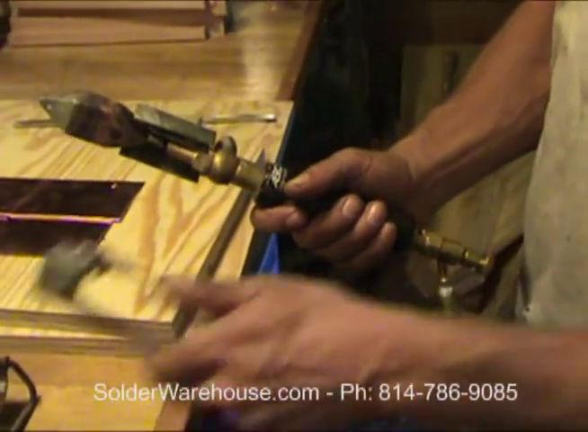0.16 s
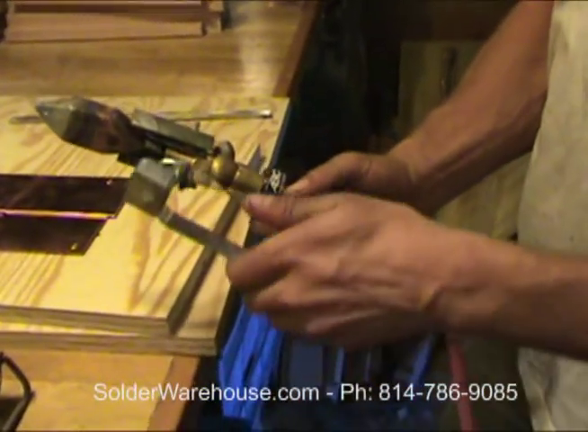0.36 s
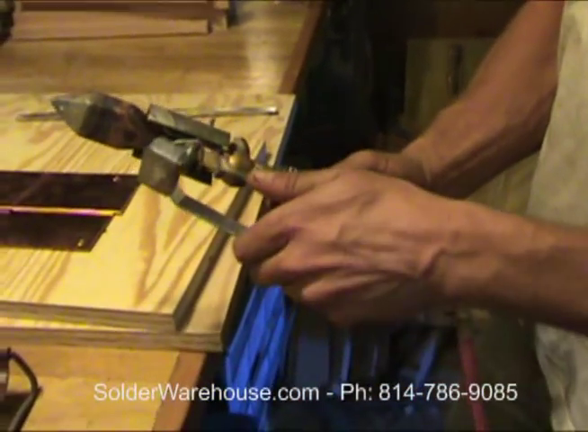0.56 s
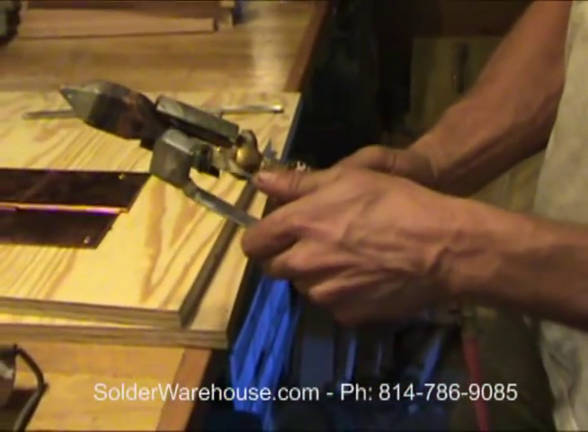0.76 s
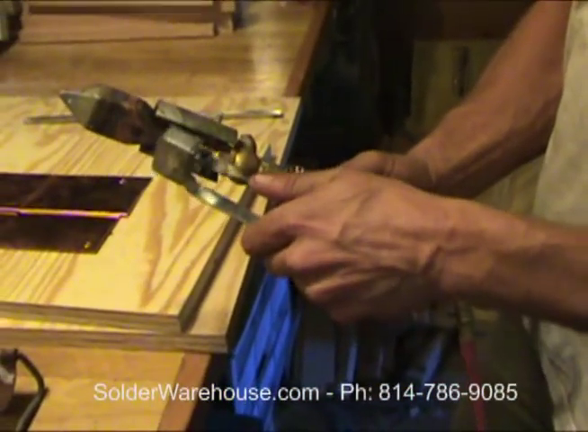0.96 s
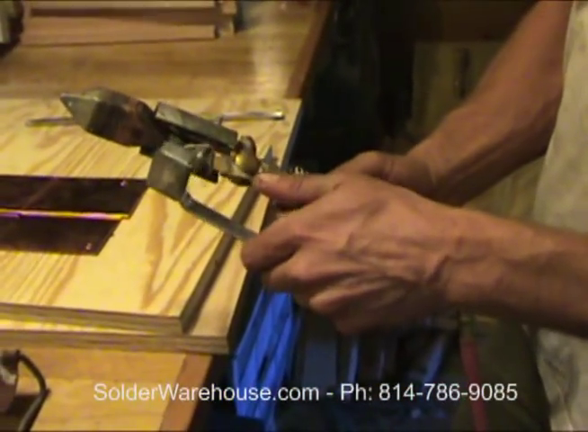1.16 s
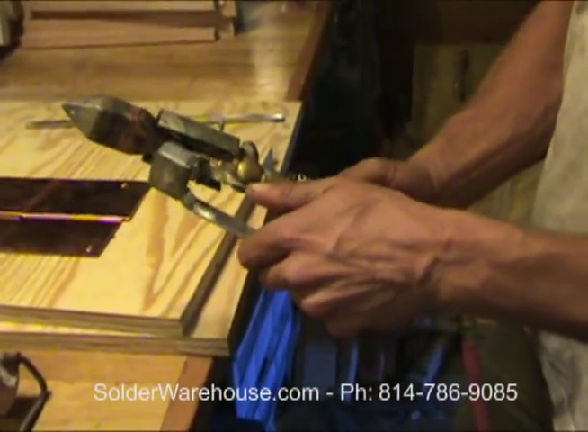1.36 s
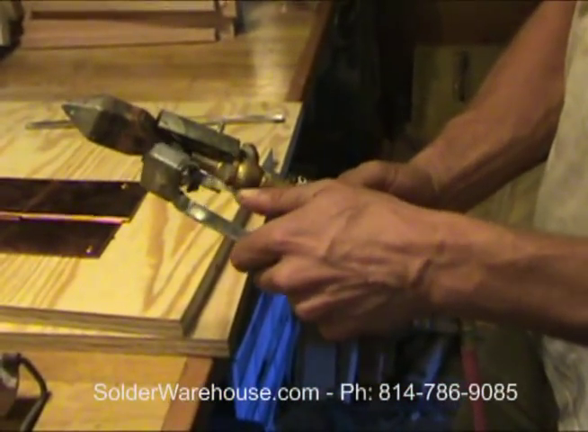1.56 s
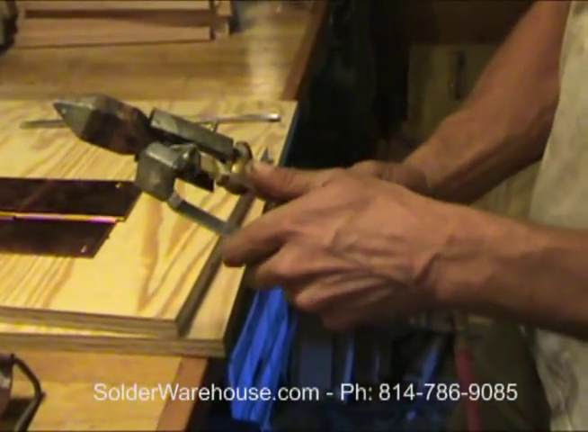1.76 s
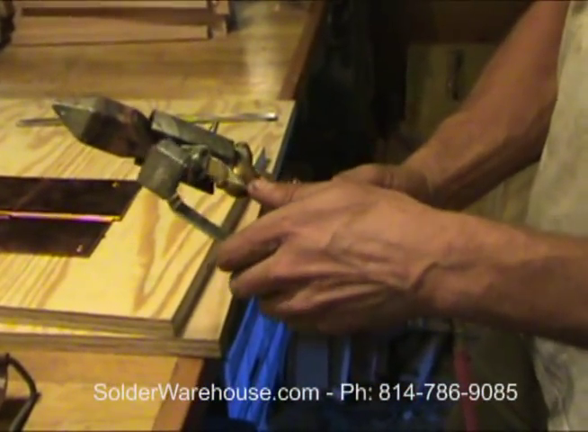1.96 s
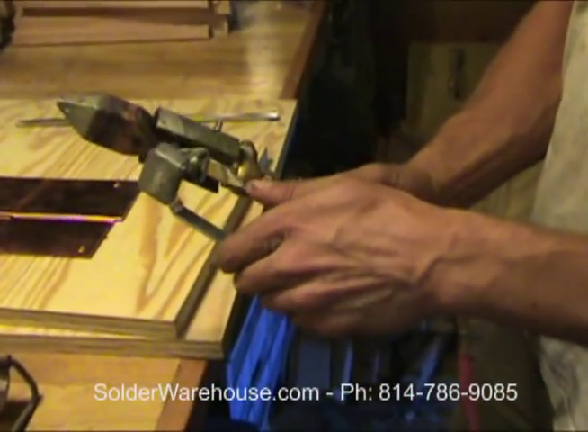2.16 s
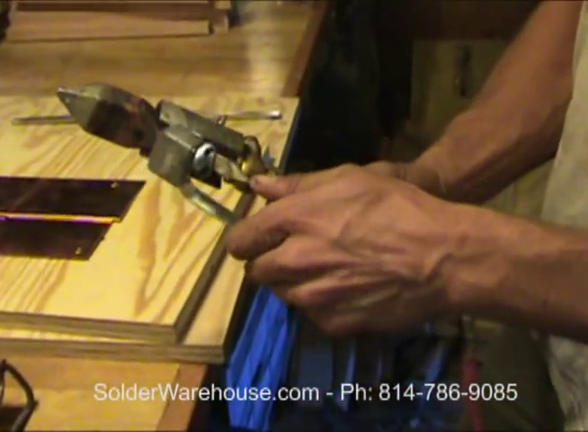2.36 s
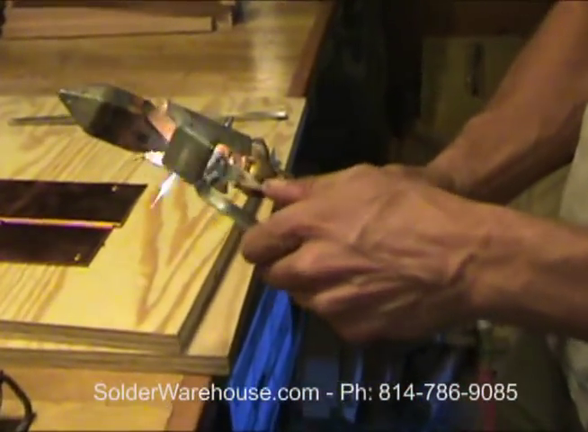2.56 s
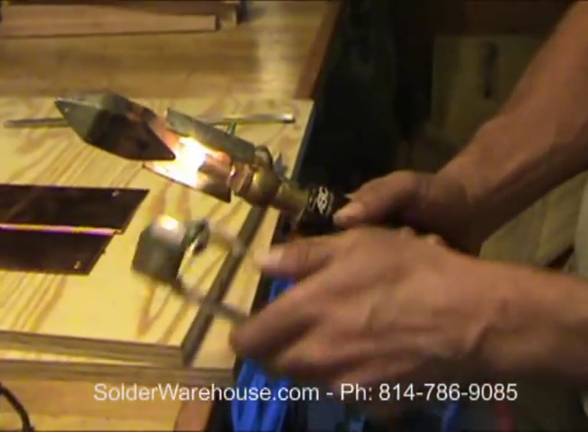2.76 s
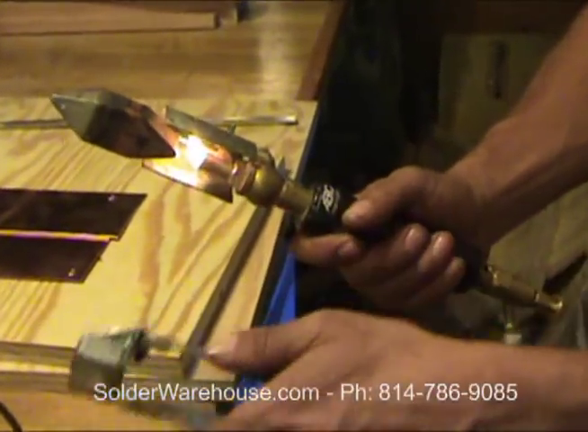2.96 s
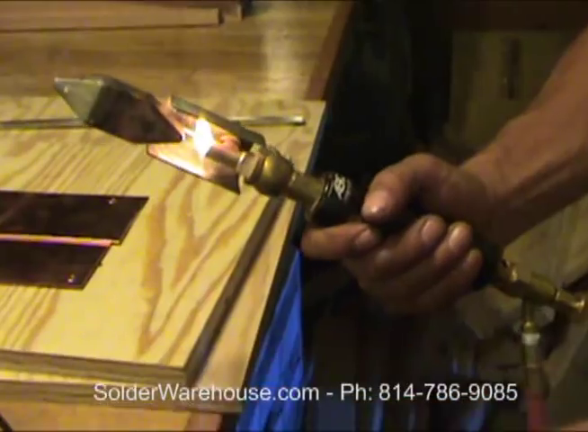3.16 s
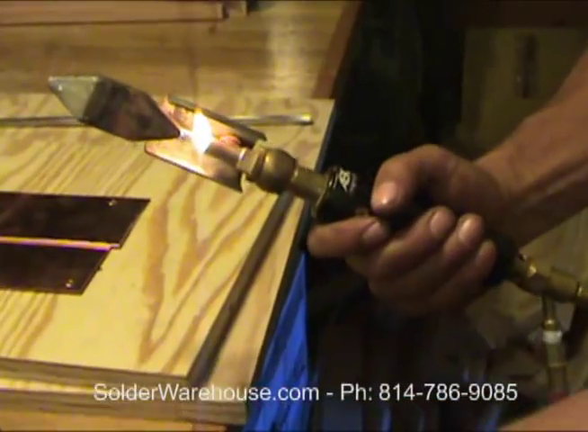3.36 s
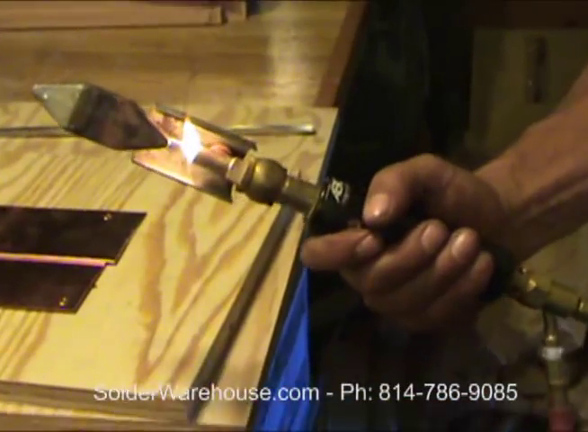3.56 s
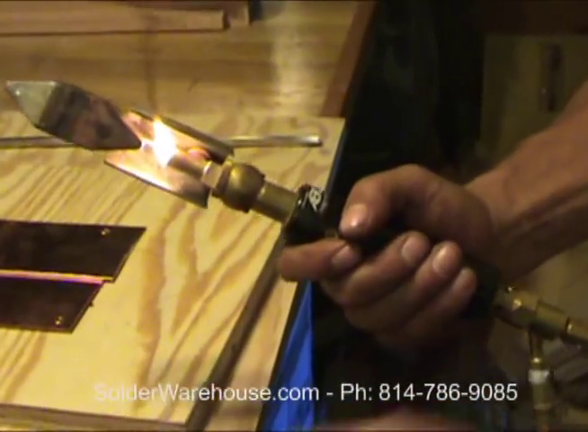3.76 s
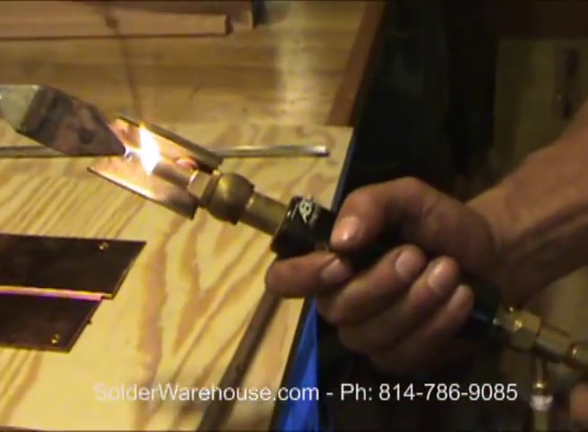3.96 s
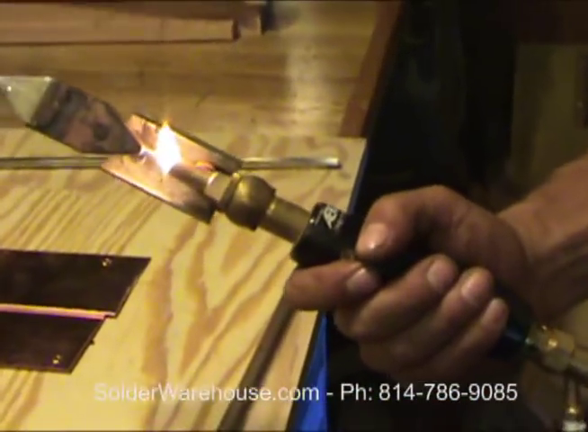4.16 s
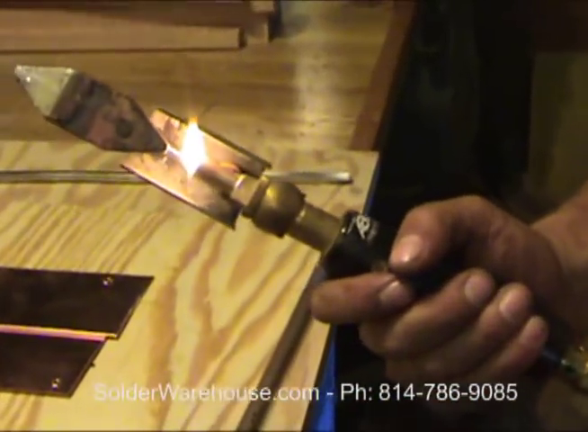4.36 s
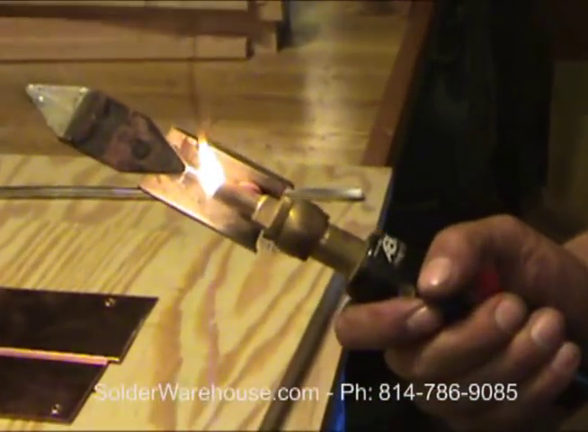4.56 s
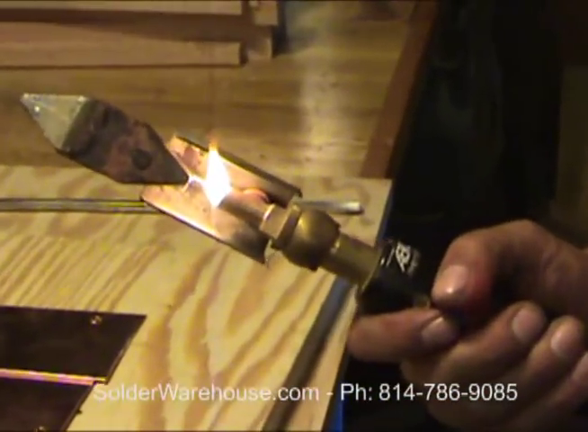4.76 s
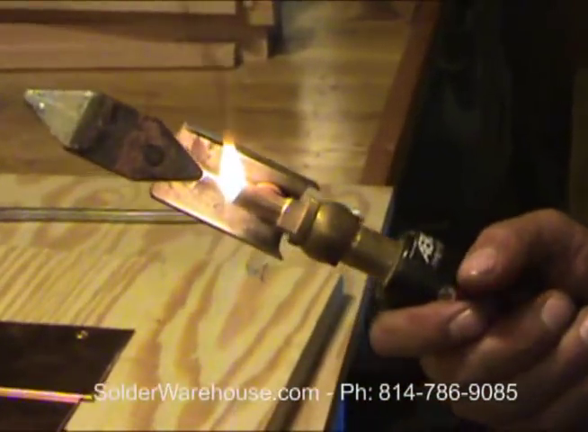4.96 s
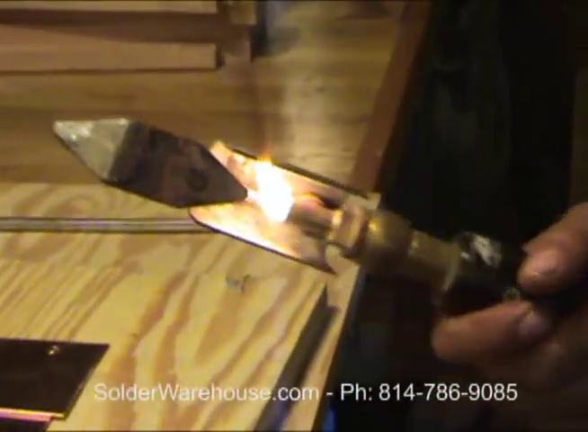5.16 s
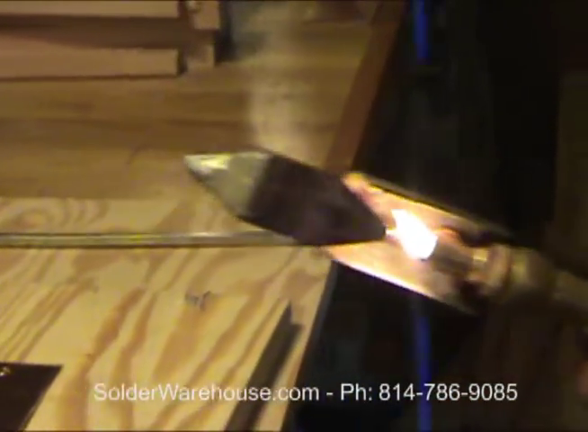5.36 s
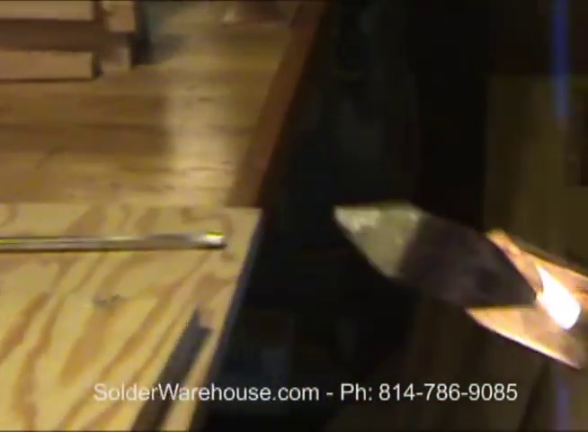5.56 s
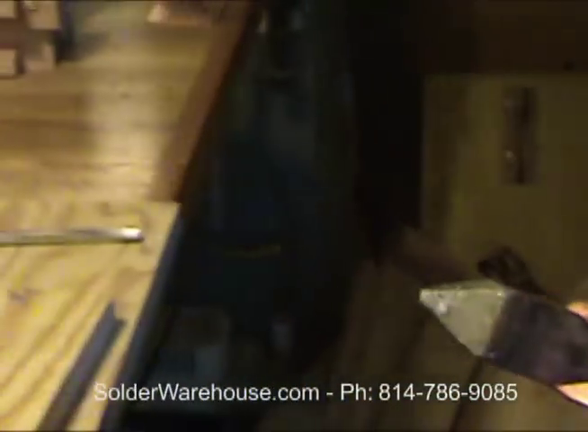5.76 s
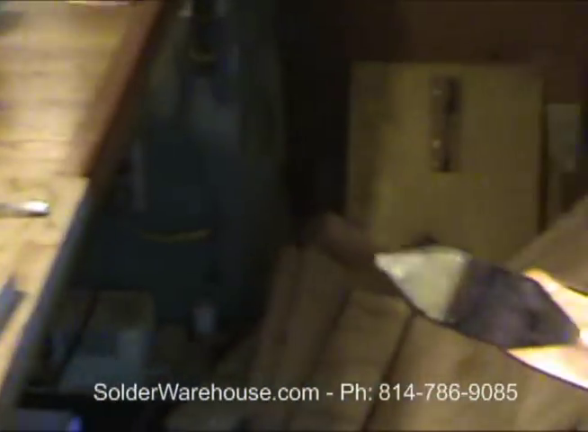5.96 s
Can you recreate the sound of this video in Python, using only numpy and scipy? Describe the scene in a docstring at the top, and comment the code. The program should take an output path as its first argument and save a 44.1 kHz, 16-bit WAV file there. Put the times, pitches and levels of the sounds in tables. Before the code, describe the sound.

A flint striker rasps and clinks several times, gas catches with a sharp pop and brief roaring hiss, then the striker clatters onto wood.

```python
"""A flint striker rasps against its steel cup, lighting a gas soldering torch over a wooden workshop bench.
Flint and arm are trains of contacts and single snags that ring the cup and crackle as coloured noise.
The gas pops as pressure pulses and gushes as shaped noise; the released striker arm buzzes on.
The valve squeaks as a few gliding harmonics, and the dropped striker rings the boards' modes as it bounces.
Taps ring the torch, noise rustles as it is carried off, and echoes, hiss, hum and a whine surround it all."""
import sys
import numpy as np
from scipy import signal
from scipy.fft import rfft, irfft, next_fast_len
from scipy.io import wavfile

SR = 44100
rng = np.random.default_rng(int(sys.argv[2]) if len(sys.argv) > 2 else 0)


def inscribe(sig):
    """Save sig as 16-bit PCM at rate SR to the path in sys.argv[1].

    A 1-D sig is mono; a 2-D sig holds one channel per row.
    Samples are clipped to [-1, 1] before scaling.
    """
    pcm = np.round(np.clip(np.atleast_2d(sig).T, -1, 1) * 32767)
    wavfile.write(sys.argv[1], SR, pcm.astype(np.int16))


N = 264600
T = np.arange(N) / SR   # time in seconds

# Ringing modes of the striker's steel cup: pitch_hz, level_db, held_t60_s (pressed by the hand), free_t60_s (let go)
CUP_MODES = [(3740, -15, 0.0059, 0.062), (4730, -13, 0.04, 0.18), (4920, -2, 0.047, 0.074),
             (4878, -4.5, 0.011, 0.17), (5070, -27.5, 0.028, 0.6), (5110, -7.5, 0.026, .26),
             (5730, -36, 0.02, 0.279), (7990, -27, 0.045, 0.1194), (8420, -20, .015, 0.045)]
# Tone of the flint's grit: pitch_hz, level_db
CRACK_SPECTRUM = [(200, -23.5), (700, -4), (1200, -7), (1900, 1.5), (3000, -8.5), (4300, 6.5), (5400, -1),
                  (6200, -2.5), (8300, -0.5), (9600, -5), (12500, -8), (16000, -14.5)]
# Tone of the arm's rattle on the cup: pitch_hz, level_db
BUZZ_SPECTRUM = [(500, -37), (1250, -23), (1700, -2), (2200, -9), (3200, -6), (4400, 5.5), (5170, 16.5),
                 (5800, -3), (8300, -5.5), (12000, -11), (16000, -21)]
# Squeezes that drag the flint over the file: start_s, length_s, relative rasp_db
STROKES = [(0.827, 0.031, -40.5), (0.863, 0.023, -30), (0.918, 0.013, -24.5), (1.192, 0.041, -25.5),
           (1.461, 0.044, -31.5), (1.526, 0.011, -31.5), (1.723, 0.043, -24.5), (2.449, 0.065, -32),
           (2.525, 0.063, -27)]
# Hardest snags of the flint and knocks of the arm on the cup: peak_s, cup_ring_db, broad crack_db
SNAGS = [(0.8391, -19, -45), (0.8745, -16, -36), (.9247, -17.5, -43), (1.204, -16, -28),
         (1.2085, -9.5, -30), (1.2128, -17.5, -37), (1.2252, -11.5, -20.5), (1.426, -28.5, -39.5),
         (1.477, -15.5, -36), (1.5023, -23.5, -38), (1.5352, -30, -28), (1.557, -26.5, -35),
         (1.73, -16, -36), (1.7392, -11, -26), (1.7483, -10, -16.5), (1.755, -10, -20.5),
         (2.4364, -24.5, -37.5), (2.456, -20, -41), (2.465, -15.5, -33), (2.4685, -15, -38),
         (2.484, -32, -32.5), (2.534, -11, -17), (2.7765, -3, -20.5), (2.8199, -17, -17),
         (2.8245, -1.5, -16.5), (2.828, -11.5, -13), (2.8412, -15, -36)]
# Pressure pulses as the gas flashes, then explodes: centre_s, peak level_db before the bass cut, half_width_s
POPS = [(2.5540, -13, .00018), (2.5587, -7.5, .0008)]
# Tone of the flame's roar: pitch_hz, level_db
ROAR_SPECTRUM = [(40, -21), (100, -3.5), (200, -2), (260, -12), (340, -2.5), (460, -6), (620, 0.5),
                 (900, -8.5), (1190, -3), (1600, -13.5), (1900, -11), (3000, -15), (3600, -23), (6000, -48)]
# Tone of the flame's hiss: pitch_hz, level_db
HISS_SPECTRUM = [(1180, -27), (2000, -8.5), (3040, -1), (3310, -7.5), (4190, -7), (5030, -1), (7570, -12),
                 (15100, -16), (16000, -21)]
# Striker bouncing on the bench: start_s, relative board_db, clack_db
BOUNCES = [(3.6088, -15.5, -17.5), (3.6682, -29, -20), (3.7235, -30, -35), (3.753, -38, -33),
           (3.792, -26, -28), (3.879, -30.5, -42), (3.952, -38.5, -54), (4.02, -51, -47)]
# Ringing modes of the bench boards: pitch_hz, level_db, t60_s
BENCH_MODES = [(148, -28, 0.23), (267, -35, 0.43), (369, -47, 0.23), (586, -2.5, 0.049), (682, -3.5, 0.07),
               (753, -6.5, 0.064), (900, -3.5, 0.13), (1236, -4.5, 0.099), (1290, -2, 0.04),
               (1480, -11, 0.041), (1630, -19, .04), (1702, -6, 0.074), (2023, -6.5, 0.056),
               (2350, -11, 0.068)]
# Tone of the striker's clack on the wood: pitch_hz, level_db
CLACK_SPECTRUM = [(120, -41), (200, -10.5), (353, -22), (1270, 0.5), (1910, -6.5), (2320, -5.5),
                  (3760, -23), (5080, -14), (5760, -35), (7380, -27), (14000, -51)]
# Tone of the striker rocking on the wood: pitch_hz, level_db
ROCK_SPECTRUM = [(60, -16), (140, -12), (260, 1), (430, -6), (650, 1), (1250, -3.5), (2200, -13),
                 (3000, -25.5), (4200, -26), (5000, -27), (5800, -36), (10000, -40)]
# Taps on the torch: start_s, ring_db, tick_db, main_mode_extra_db
TAPS = [(1.0536, -32.5, -26, 2.5), (1.061, -55, -28, -6), (1.965, -68, -43, -1), (3.308, -67, -43, -5),
        (4.156, -56, -35, -6), (4.168, -36.5, -32.5, -20), (4.7573, -53, -38, -2), (5.624, -62, -33, -8)]
# Ringing modes of the torch's copper shield: pitch_hz, level_db, t60_s
SHIELD_MODES = [(611, -23.5, 0.48), (1360, -17, 0.085), (1874, 1, 0.068), (1957, -8, 0.33),
                (2832, -1.5, 0.24), (3490, -13, 0.35), (5346, -21, 0.33), (7262, -30, .25),
                (9900, -21, 0.19)]
# Tone of each tap's dry tick: pitch_hz, level_db
TICK_SPECTRUM = [(200, -26), (600, -5.5), (900, -9.5), (1300, 3), (1900, 2), (2500, -5.5), (5200, -2.5),
                 (6200, -12.5), (9000, -13.5), (12000, -35), (16000, -47)]
# Course of the valve squeak: time_s, pitch_hz, relative level_db
SQUEAK_PATH = [(3.24, 1660, -79), (3.27, 1595, -56), (3.305, 1524, -50), (3.345, 1500, -46),
               (3.385, 1573, -43), (3.405, 1530, -52.5), (3.43, 1515, -52)]
# Harmonics of the squeak: multiple (of the pitch), level_db
SQUEAK_PARTIALS = [(1, -0.5), (2, -2), (3, -7.5), (4, -10.5)]
# Sleeves and shoes as the torch is moved: peak_s, rise_s, relative scuff_db, relative swish_db
RUSTLES = [(.03, .03, -50.5, -70), (4.878, 0.03, -46.5, -51), (4.989, .027, -38, -36),
           (5.07, 0.037, -47, -58), (5.192, 0.034, -45, -51.5), (5.459, 0.066, -48.5, -51),
           (5.88, 0.078, -44.5, -55), (5.966, 0.035, -43, -56)]
# Tone of the dull scuffing: pitch_hz, level_db
SCUFF_SPECTRUM = [(100, -7), (200, -6), (450, 3), (650, 6), (1000, 1), (1500, 1), (2200, 3), (3200, 0),
                  (5000, -9), (9000, -20)]
# Tone of the bright swishing: pitch_hz, level_db
SWISH_SPECTRUM = [(1180, -27), (2000, -14), (3760, -3), (5270, 1.5), (7330, -6.5), (9590, -8), (10500, -16),
                  (15000, -22)]
# Soft bumps of hands and feet: start_s, level_db, pitch_hz
BUMPS = [(1.859, -43, 56), (1.94, -42, 50.7), (1.95, -47.5, 120), (2.001, -45.5, 51.5), (4.957, -36, 520),
         (5.227, -45.5, 196), (5.42, -40.5, 261), (5.516, -41, 187), (5.534, -40.5, 49)]
# Workshop echoes by band: pitch_hz, echo level_db, t60_s
ROOM_BANDS = [(100, -15.5, 0.52), (400.4, -5, 0.45), (1020, -16.5, 0.49), (2550, -6.5, 0.49),
              (5072, -17, 0.43), (9028, -10, 0.17), (16088, -13.5, 0.29)]
# How unlike the echoes are at the two capsules: pitch_hz, level_db
ECHO_WIDTH = [(125, -17), (250, -14), (500, -8), (1000, -3.5), (2500, -7.5), (5000, -18), (9000, -13.5)]
# Tone of the early reflection's difference between the capsules: pitch_hz, level_db
REFLECTION_WIDTH = [(60, 11.5), (300, -0.5), (1200, -6.5), (3200, 3.5), (4400, -11), (5500, -17.5),
                    (7000, 5), (10000, 10), (14000, 2)]
# Tone of the background air and hiss: pitch_hz, level_db
AIR_SPECTRUM = [(20, 13.5), (50, 16.5), (75, 8.5), (100, 4), (140, 10), (300, 8), (600, 5.5), (1200, 2),
                (2500, -1), (7000, 0), (13000, -1), (16000, -1.5)]
# Tone of the part of the air that differs between the ears: pitch_hz, level_db
AIR_SIDE_SPECTRUM = [(20, 13), (60, 13), (100, 3), (3200, 2), (4500, -15), (16000, -24)]
# Low hum and thin whine: pitch_hz, rms level_db (both before a small waver)
HUM_TONES = [(70, -61.5), (11538, -69)]

STROKE_ATTACK_S, STROKE_RELEASE_S = 0.0075, 0.052
# The spring arm shivers on after each squeeze, at a level relative to the rasp.
SHIVER_DB, SHIVER_T60_S = -25.5, 0.44
# A snag of this crack level swells for so long; harder ones are more abrupt.
SWELL_S, SWELL_AT_DB, SWELL_SHORTENS = 0.0007, -29, 0.8
# Released, the arm buzzes against the cup, then dies away.
RELEASE_AT_S = 2.823
BUZZ_DB, BUZZ_ATTACK_S, BUZZ_HOLD_S, BUZZ_T60_S = -25, 0.006, 0.067, 0.39
# From the moment it catches: a short blast, a roar that burns down, a hiss.
CATCH_S, FLAME_ATTACK_S = 2.554, 0.0058
BLAST_DB, BLAST_T60_S = -12.5, 0.047
ROAR_DB, ROAR_HOLD_S, ROAR_T60_S = -30, 0.07, 0.36
HISS_DB, HISS_HOLD_S, HISS_T60_S = -34.5, 0.096, 0.194
BOUNCE_CUP_DB = -19   # ring of the cup relative to each clack
# From the first bounce it rocks, ever more weakly, until it lies still.
ROCK_DB, ROCK_ATTACK_S, ROCK_LENGTH_S, ROCK_T60_S = -31, 0.013, 0.42, 0.33
ROCK_SAG_DB_PER_S = 30.5
SHIELD_MAIN_MODE = 4   # row of SHIELD_MODES, counted from 0
RUSTLE_FALL = 1.51   # a rustle fades this many times more slowly than it rises
BUMP_CYCLES = 15.5   # each bump dies away by 60 dB in this many cycles
AIR_DB, AIR_SIDE_DB = -54, -62.5
TONE_WAVER = 0.00088   # hum and whine wander by this share of their pitch
CUTOFF_HZ = 15900
LEFT_RIGHT = np.array([[1], [-1]])   # adds to the left, subtracts from the right


def from_db(db):
    """Decibels to gain."""
    return 10 ** (np.asarray(db) / 20)


def rms_one(x):
    """Scale to unit power."""
    return x / np.sqrt(np.mean(x ** 2) + 1e-20)


def gain_curve(rows, order=1):
    """A dB column as gain in time, silent outside its span."""
    rows = np.array(rows)
    return from_db(np.interp(T, rows[:, 0], rows[:, order], left=-200, right=-200))


def envelope(start, attack, hold, t60):
    """Rise from the start, stay until the hold ends, then die away by 60 dB in t60."""
    age = T - start
    fall = np.clip((age - hold) / t60, 0, 2)
    return np.clip(age / attack, 0, 1) * np.exp(-np.log(1000) * fall)


def clicks(times, heights):
    """Single-sample impulses."""
    return np.bincount(np.round(np.asarray(times) * SR).astype(int), heights, N)[:N]


def colour(x, spectrum):
    """Causal (minimum-phase) filter with this spectrum; white noise keeps its power."""
    size = next_fast_len(N + SR // 2) // 2 * 2
    hz, db = np.transpose(spectrum)
    grid = np.maximum(np.arange(size // 2 + 1) * SR / size, 1)
    gain = rms_one(from_db(np.interp(np.log(grid), np.log(hz), db)))
    # folding the cepstrum onto positive time gives minimum phase
    cepstrum = irfft(np.log(gain))
    cepstrum[1:size // 2] *= 2
    cepstrum[size // 2 + 1:] = 0
    return irfft(rfft(x, size) * np.exp(rfft(cepstrum)))[..., :N]


def noise(spectrum):
    """Steady coloured noise of about unit power."""
    return colour(rng.standard_normal(N), spectrum)


def drift(rate):
    """Slow random wander around 0 with a spread of about 1, drawing `rate` new values per second."""
    knots = rng.standard_normal(N)
    return np.interp(T * rate, np.arange(N), knots)


def ring(x, hz, t60):
    """A resonator: a unit click sets a decaying sine of height about 1 ringing."""
    r = from_db(-60 / (t60 * SR))
    w = 2 * np.pi * hz / SR
    return signal.lfilter([0, np.sin(w)], [1, -2 * r * np.cos(w), r * r], x + 1e-18)


def bursts(hits, t60):
    """Each click opens a dying noise burst of micro-contacts."""
    power = signal.lfilter([1], [1, -from_db(-120 / (t60 * SR))], hits ** 2 + 1e-18)
    return np.sqrt(power) * rng.standard_normal(N)


def strike(times, levels_db, modes, spread_db):
    """Every blow excites each mode with a strength of its own."""
    luck = rng.standard_normal((len(times), len(modes)))
    total = 0
    for k, (hz, db, t60) in enumerate(modes):
        blows = clicks(times, from_db(levels_db + db + spread_db * luck[:, k]))
        total = total + ring(blows, hz, t60)
    return total


def chatter(per_s, jitter, spread_db):
    """An uneven train of contacts, jittered in rate and strength."""
    rate = per_s * np.exp(jitter * drift(per_s))
    turns = np.floor(np.cumsum(rate) / SR)
    return np.diff(turns, prepend=0) * from_db(spread_db * rng.standard_normal(N))


def striker():
    """The flint catches and slips on the file; released, the spring arm buzzes against the freely ringing cup."""
    held = [(hz, db, t60) for hz, db, t60, _ in CUP_MODES]
    free = [(hz, db, t60) for hz, db, _, t60 in CUP_MODES]
    snags = catches(held, crack_t60=0.02, spread_db=2.5)

    teeth = chatter(per_s=400, jitter=0.54, spread_db=0.5)
    grit = rms_one(colour(bursts(teeth, t60=0.012), CRACK_SPECTRUM))
    rasp = from_db(-7.5) * cup(teeth, held) + from_db(-7.5) * grit

    beats = chatter(per_s=290, jitter=0.33, spread_db=2.0)
    rattle = rms_one(colour(bursts(beats, t60=0.018), BUZZ_SPECTRUM))
    buzz = from_db(-3) * cup(beats, free) + from_db(0.5) * rattle

    drag, shiver = 0, 0
    for s, length, db in STROKES:
        drag = drag + from_db(db) * envelope(s, STROKE_ATTACK_S, length, STROKE_RELEASE_S)
        shiver = shiver + from_db(db + SHIVER_DB) * envelope(s, length, length, SHIVER_T60_S)
    swing = from_db(BUZZ_DB) * envelope(RELEASE_AT_S, BUZZ_ATTACK_S, BUZZ_HOLD_S, BUZZ_T60_S)
    return snags + rasp * drag + buzz * (shiver + swing)


def cup(x, modes):
    """The striker's cup driven by many contacts; unit power."""
    return rms_one(sum(from_db(db) * ring(x, hz, t60) for hz, db, t60 in modes))


def catches(modes, crack_t60, spread_db):
    """Friction pumps the cup up over a millisecond or so while grit cracks off the flint; then both die away."""
    rings, grit_power = np.zeros(N), np.zeros(N)
    t = np.arange(-SR // 50, SR // 10) / SR   # time around the peak of a snag
    age = np.maximum(t, 0)
    hz, db, t60 = np.transpose(modes)[:, :, None]
    luck = rng.standard_normal((len(SNAGS), 2, len(modes), 1))
    for (peak, ring_db, crack_db), (strength, phase) in zip(SNAGS, luck):
        span = round(peak * SR) + np.round(t * SR).astype(int)
        rise = SWELL_S * from_db(SWELL_SHORTENS * (SWELL_AT_DB - crack_db))
        swell = np.exp(-(np.minimum(t, 0) / rise) ** 2)
        mode_gain = from_db(db + spread_db * strength) * np.exp(-np.log(1000) * age / t60)
        partials = mode_gain * np.sin(2 * np.pi * hz * t + phase)
        clink = swell * partials.sum(axis=0)
        rings[span] += from_db(ring_db) * clink / np.abs(clink).max()
        crack = from_db(crack_db) * swell * np.exp(-np.log(1000) * age / crack_t60)
        grit_power[span] += crack ** 2
    return rings + colour(np.sqrt(grit_power) * rng.standard_normal(N), CRACK_SPECTRUM)


def ignition():
    """Pooled gas explodes in N-shaped pressure pulses, then burns off with a roar and a sputtering hiss."""
    pop = 0
    for centre, db, half_width in POPS:
        u = (T - centre) / half_width
        pop = pop - from_db(db) * u * np.exp((1 - u * u) / 2)
    # so small a flame radiates little bass
    pop = signal.sosfilt(signal.butter(1, 80, "high", fs=SR, output="sos"), pop)
    blast = from_db(BLAST_DB) * envelope(CATCH_S, FLAME_ATTACK_S, FLAME_ATTACK_S, BLAST_T60_S)
    burn = from_db(ROAR_DB) * envelope(CATCH_S, FLAME_ATTACK_S, ROAR_HOLD_S, ROAR_T60_S)
    roar = noise(ROAR_SPECTRUM) * (blast + burn)
    sputter = from_db(HISS_DB + 1.5 * drift(300))
    hiss = noise(HISS_SPECTRUM) * envelope(CATCH_S, FLAME_ATTACK_S, HISS_HOLD_S, HISS_T60_S) * sputter
    return pop + roar + hiss


def valve():
    """The stem sticks and slips in its packing: a thin, unsteady squeak that also stirs the shield's main mode."""
    s, hz, db = np.transpose(SQUEAK_PATH)
    pitch = np.interp(T, s, hz) * (1 + 0.0184 * drift(650))
    phase = 2 * np.pi * np.cumsum(pitch) / SR
    tone = sum(from_db(db) * np.sin(round(k) * phase) for k, db in SQUEAK_PARTIALS)
    effort = gain_curve(SQUEAK_PATH, order=2) * from_db(2 * drift(110))
    friction = effort * rng.standard_normal(N)
    shield_hz, _, shield_t60 = SHIELD_MODES[SHIELD_MAIN_MODE]
    shield = ring(friction, shield_hz, shield_t60)
    return tone * effort + from_db(-14.0) * friction + from_db(-37) * shield


def bench():
    """The dropped striker bounces on the boards, ringing their modes and its own cup, and rocks to rest."""
    s, board_db, clack_db = np.transpose(BOUNCES)
    # neighbouring modes swing opposite ways
    boards = strike(s, board_db, BENCH_MODES[::2], spread_db=2.0)
    boards = boards - strike(s, board_db, BENCH_MODES[1::2], spread_db=1.5)
    clack = colour(bursts(clicks(s, from_db(clack_db)), t60=0.11), CLACK_SPECTRUM)
    held = [mode[:3] for mode in CUP_MODES]
    clink = strike(s, clack_db + BOUNCE_CUP_DB, held, spread_db=7.5)
    contacts = chatter(per_s=140, jitter=0.3, spread_db=2.0)
    rocking = rms_one(colour(bursts(contacts, t60=0.054), ROCK_SPECTRUM))
    sway = envelope(s[0], ROCK_ATTACK_S, ROCK_LENGTH_S, ROCK_T60_S)
    sway = sway * from_db(ROCK_DB - ROCK_SAG_DB_PER_S * (T - s[0]))
    return from_db(-1) * boards + clack + clink + rocking * sway


def torch():
    """Taps ring the copper shield; the place of contact decides how much its main mode speaks."""
    s, ring_db, tick_db, main_db = np.transpose(TAPS)
    rings = 0
    for k, (hz, db, t60) in enumerate(SHIELD_MODES):
        extra_db = main_db * (k == SHIELD_MAIN_MODE)
        rings = rings + ring(clicks(s, from_db(ring_db + db + extra_db)), hz, t60)
    ticks = colour(bursts(clicks(s, from_db(tick_db)), t60=0.044), TICK_SPECTRUM)
    return rings + ticks


def handling():
    """Cloth and soles rub in grains, swelling and fading with each move; hands and feet make dull bumps."""
    scuffing, swishing = 0, 0
    for peak, rise, scuff_db, swish_db in RUSTLES:
        move = np.exp(-((T - peak) / np.where(T < peak, rise, RUSTLE_FALL * rise)) ** 2)
        scuffing = scuffing + from_db(scuff_db) * move
        swishing = swishing + from_db(swish_db) * move
    scuff = noise(SCUFF_SPECTRUM) * scuffing
    swish = noise(SWISH_SPECTRUM) * swishing
    grain = from_db(1.7 * drift(150))
    bumps = sum(ring(clicks([s], [from_db(db)]), hz, BUMP_CYCLES / hz) for s, db, hz in BUMPS)
    return (from_db(-3.5) * scuff + from_db(-4.0) * swish) * grain + bumps


def workshop(x):
    """Diffuse echoes die band by band and reach the two capsules differently, though nearly alike in the bass."""
    t, echo = T[:SR], 0
    hz, level_db, t60 = np.transpose(ROOM_BANDS)
    width_hz, width_db = np.transpose(ECHO_WIDTH)
    edges = np.geomspace(60, 17000, 13)
    for low, high in zip(edges, edges[1:]):
        centre = np.log(low * high) / 2   # log of the band's middle pitch
        band_pass = signal.butter(2, [low, high], "band", fs=SR, output="sos")
        band = signal.sosfilt(band_pass, rng.standard_normal((2, SR)))   # rows: mid, side
        band[1] *= from_db(np.interp(centre, np.log(width_hz), width_db))
        decay = from_db(-60 * t / np.interp(centre, np.log(hz), t60))
        decay = decay * (1 - np.exp(-(t / 0.0058) ** 2))   # echoes build up over some milliseconds
        level = from_db(np.interp(centre, np.log(hz), level_db))
        echo = echo + band * decay / np.linalg.norm(decay) * level
    mid, side = signal.fftconvolve(x[None], echo, axes=1)[:, :N]
    return mid + side * LEFT_RIGHT


def background():
    """Room air and microphone hiss as coloured noise, with a low hum and a thin whine as wavering sines."""
    air = from_db(AIR_DB) * noise(AIR_SPECTRUM)
    air = air + from_db(AIR_SIDE_DB) * noise(AIR_SIDE_SPECTRUM) * LEFT_RIGHT
    clock = np.cumsum(1 + TONE_WAVER * drift(40)) / SR
    tones = sum(np.sqrt(2) * from_db(db) * np.sin(2 * np.pi * hz * clock) for hz, db in HUM_TONES)
    return air + tones * from_db(0.7 * drift(8))


def scene():
    """All sits near the middle, the bench a little left; an early reflection reaches the capsules unequally."""
    near = striker() + ignition() + torch() + valve() + handling()
    dropped = bench()
    both = near + dropped
    direct = near + dropped * from_db(0.99 * LEFT_RIGHT)
    delayed = np.interp(T - 0.0017, T, both)
    reflection = from_db(-18.5) * colour(delayed, REFLECTION_WIDTH)
    return direct + reflection * LEFT_RIGHT + workshop(both) + background()


def record(dry):
    """A steep low-pass cuts the top."""
    return signal.sosfilt(signal.ellip(10, 0.1, 80, CUTOFF_HZ, fs=SR, output="sos"), dry)


dry = scene()
out = record(dry)
inscribe(out)
```